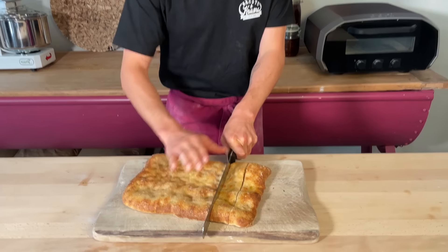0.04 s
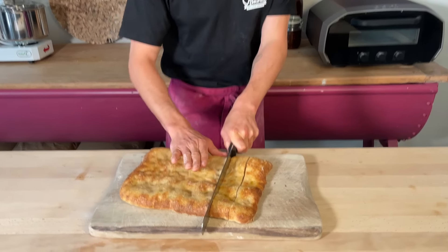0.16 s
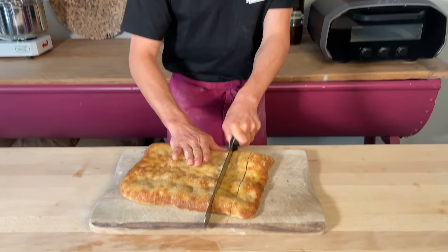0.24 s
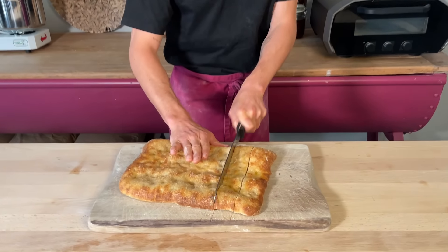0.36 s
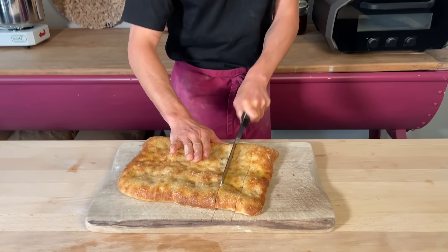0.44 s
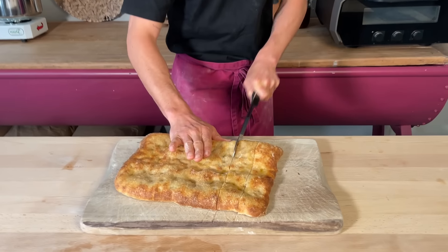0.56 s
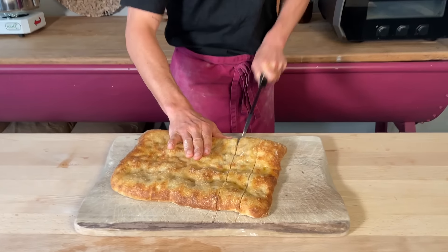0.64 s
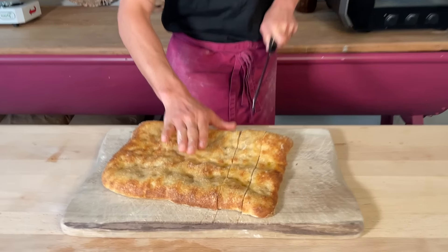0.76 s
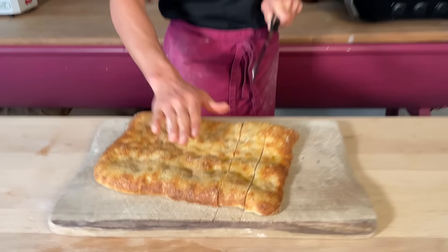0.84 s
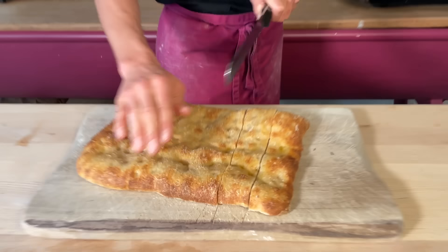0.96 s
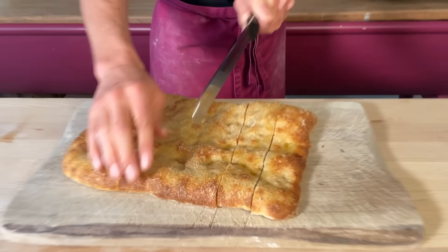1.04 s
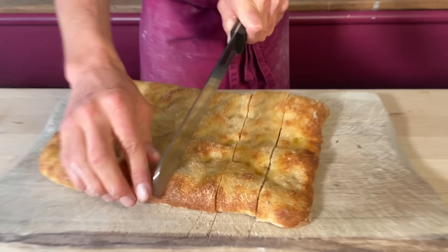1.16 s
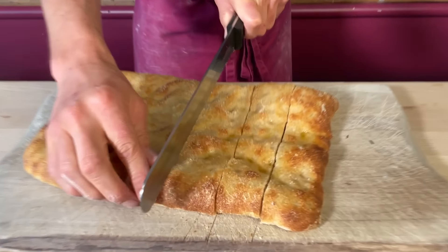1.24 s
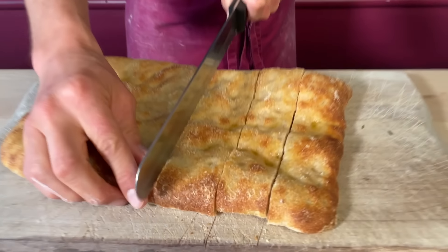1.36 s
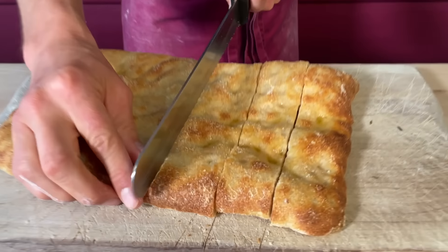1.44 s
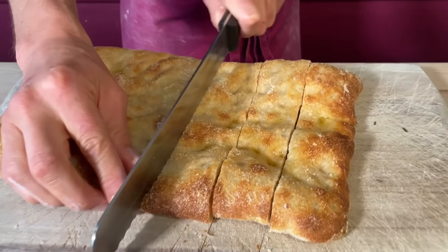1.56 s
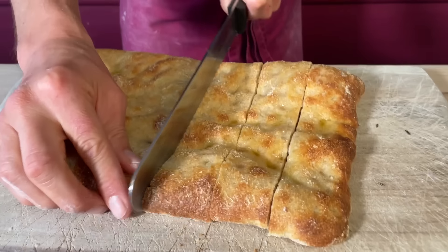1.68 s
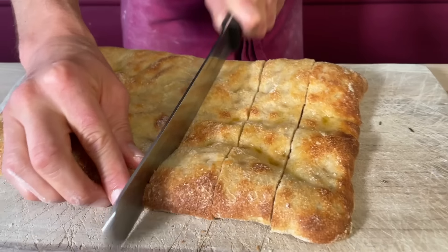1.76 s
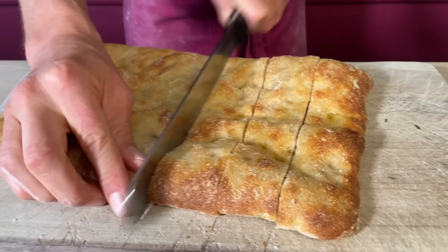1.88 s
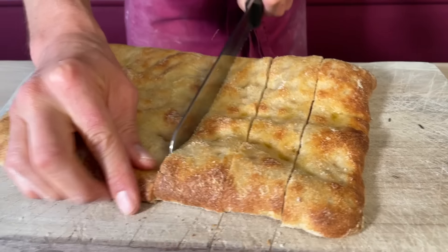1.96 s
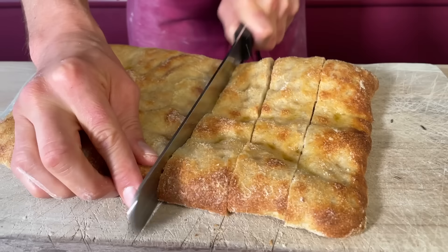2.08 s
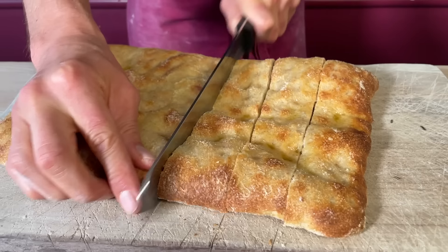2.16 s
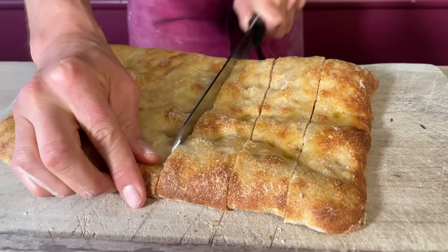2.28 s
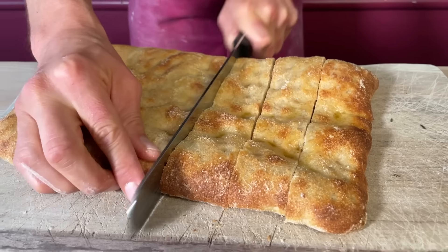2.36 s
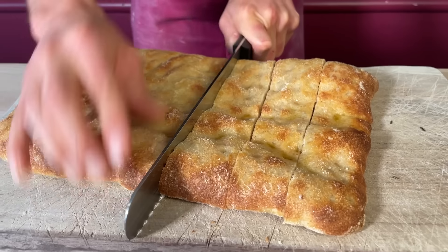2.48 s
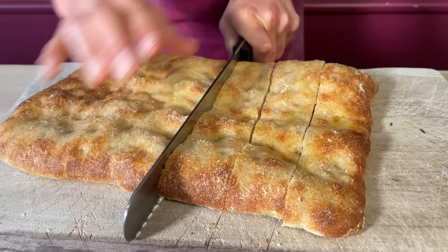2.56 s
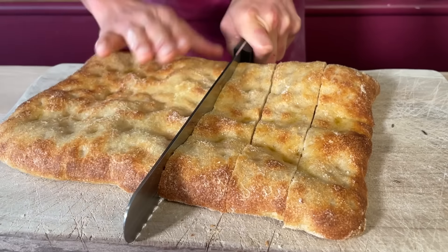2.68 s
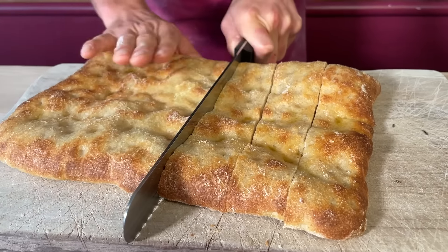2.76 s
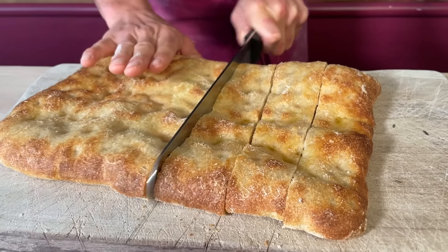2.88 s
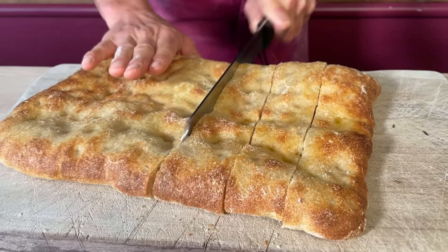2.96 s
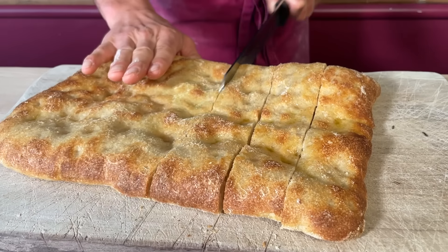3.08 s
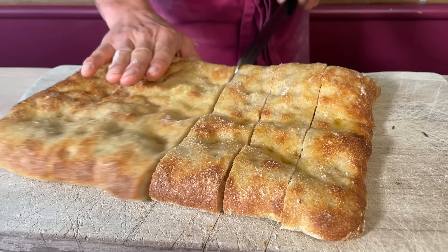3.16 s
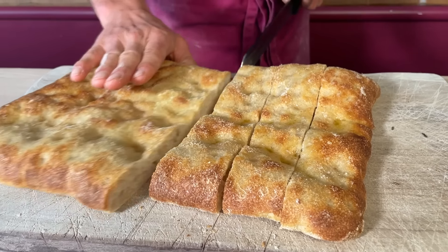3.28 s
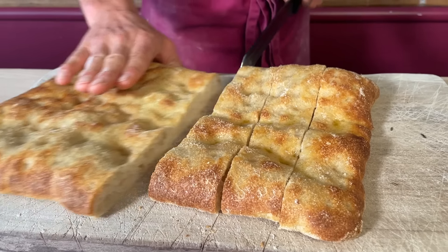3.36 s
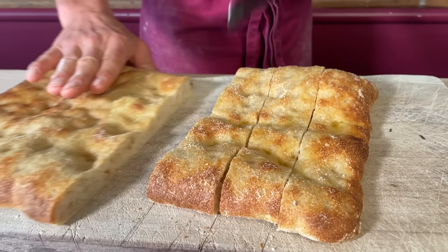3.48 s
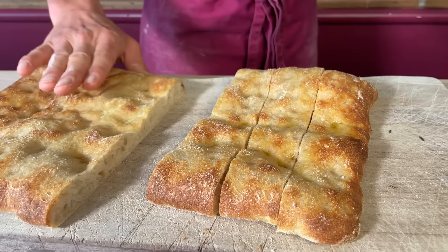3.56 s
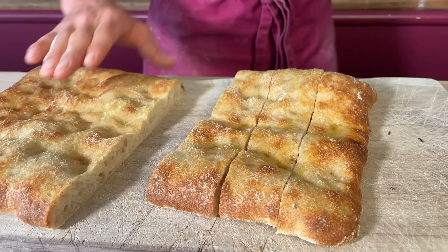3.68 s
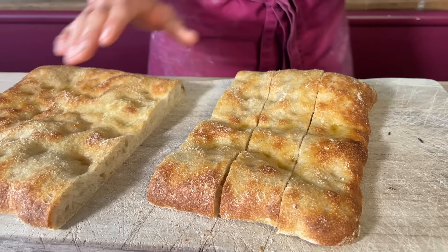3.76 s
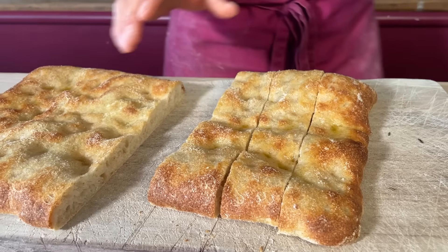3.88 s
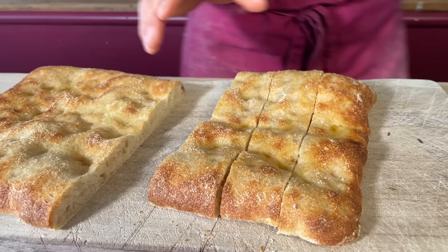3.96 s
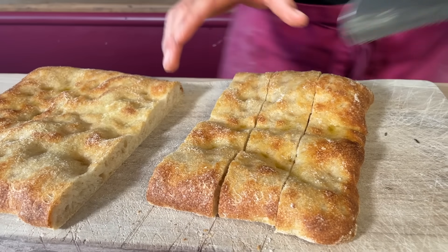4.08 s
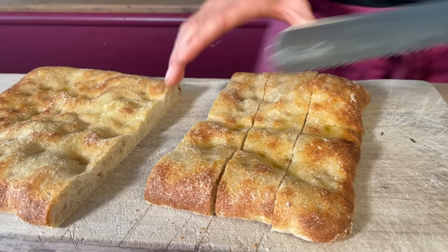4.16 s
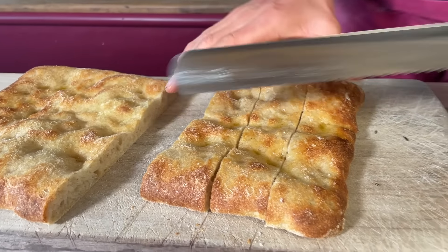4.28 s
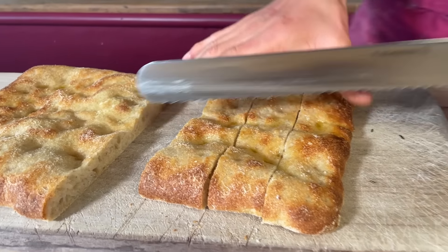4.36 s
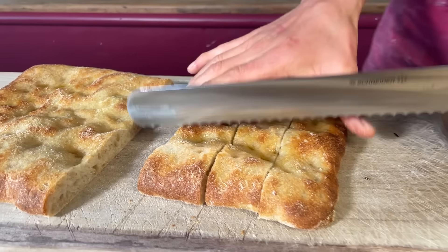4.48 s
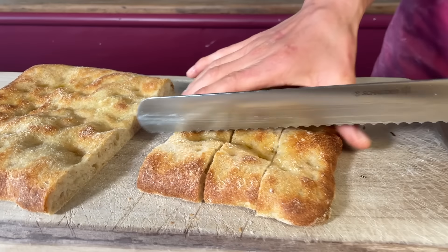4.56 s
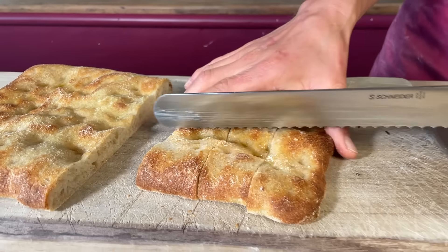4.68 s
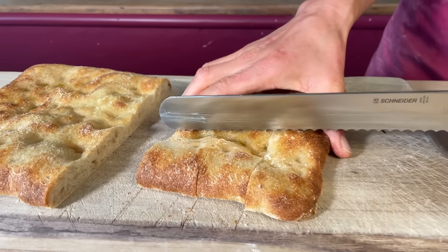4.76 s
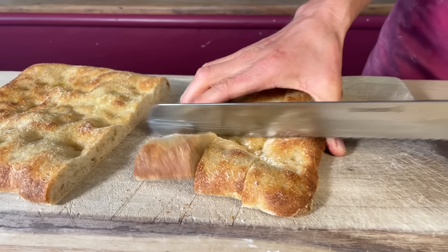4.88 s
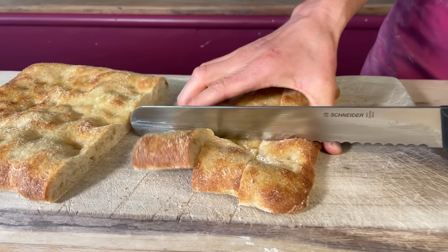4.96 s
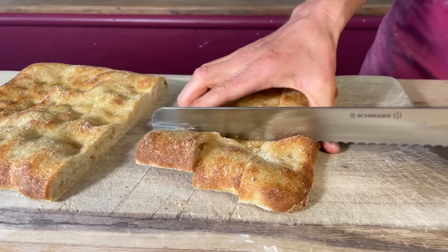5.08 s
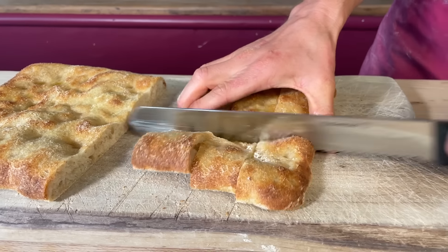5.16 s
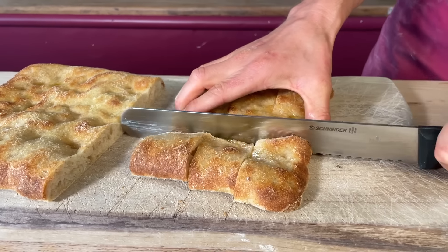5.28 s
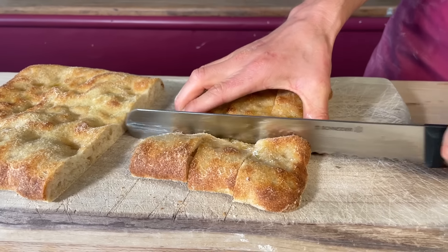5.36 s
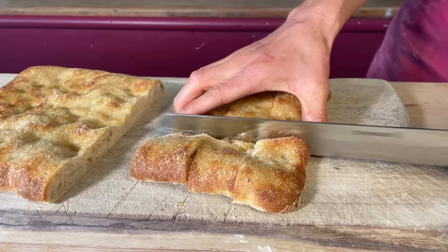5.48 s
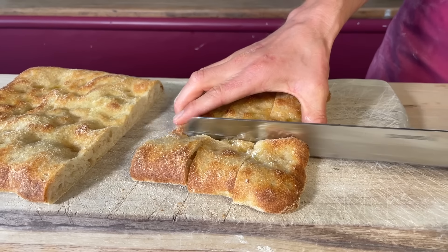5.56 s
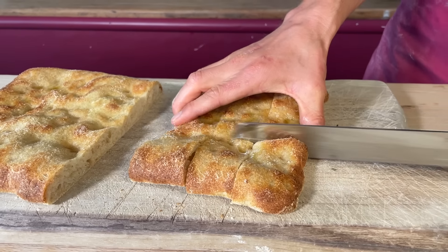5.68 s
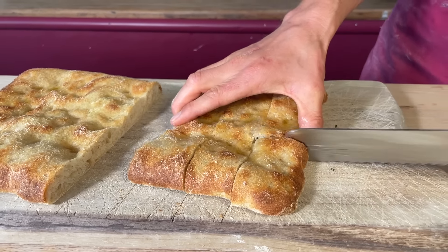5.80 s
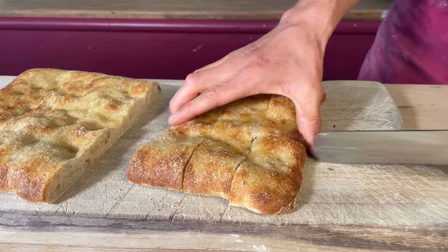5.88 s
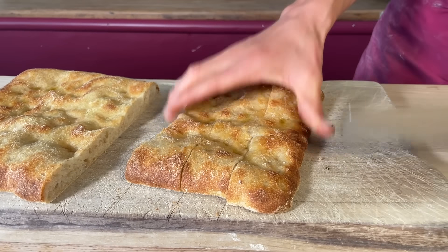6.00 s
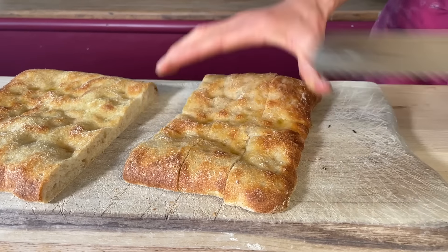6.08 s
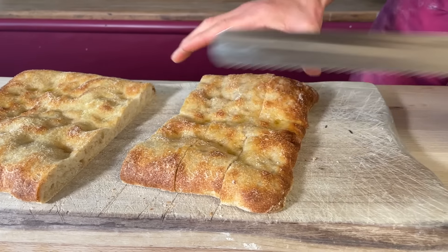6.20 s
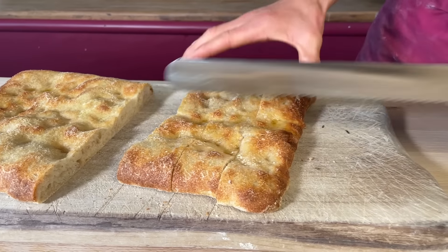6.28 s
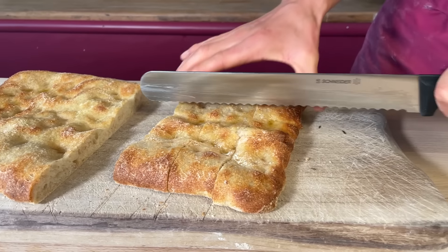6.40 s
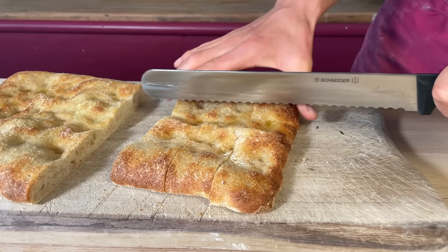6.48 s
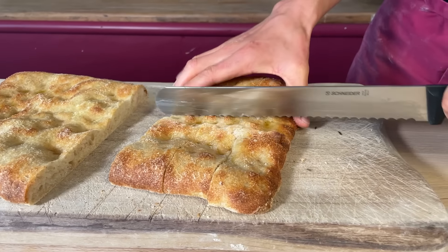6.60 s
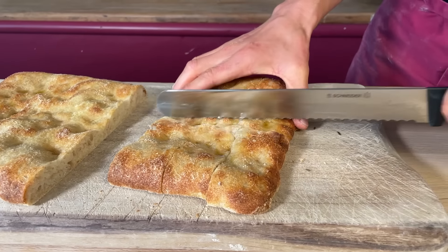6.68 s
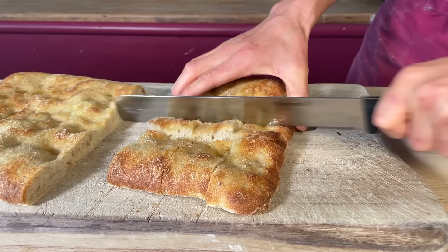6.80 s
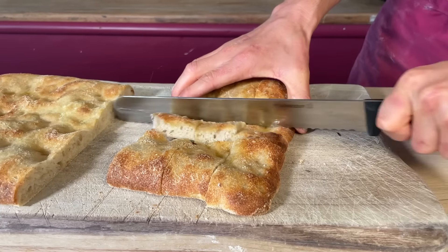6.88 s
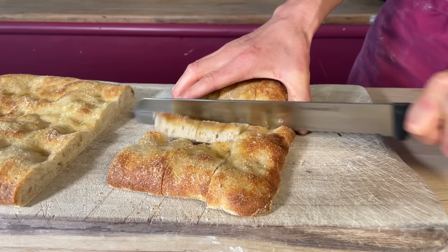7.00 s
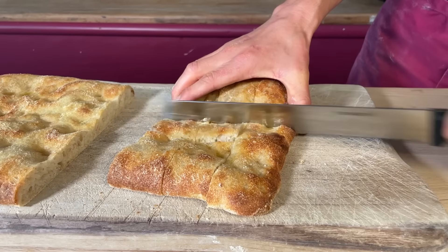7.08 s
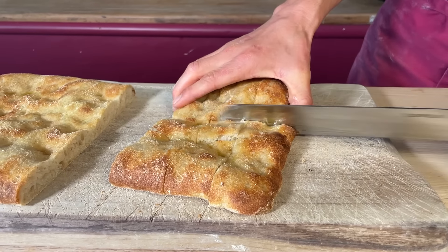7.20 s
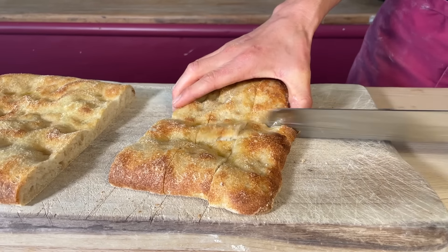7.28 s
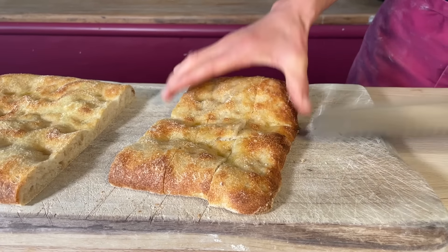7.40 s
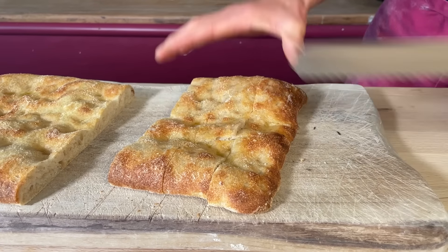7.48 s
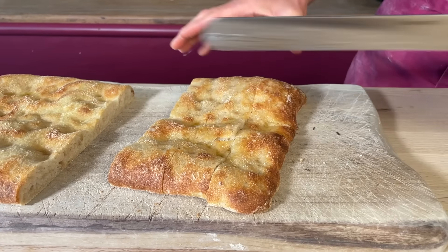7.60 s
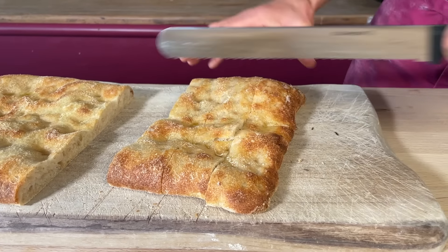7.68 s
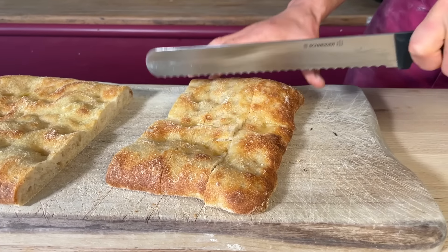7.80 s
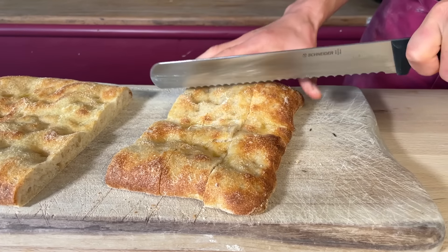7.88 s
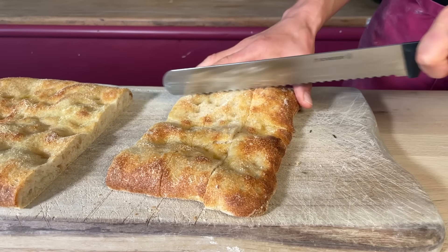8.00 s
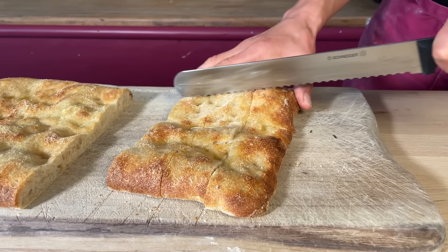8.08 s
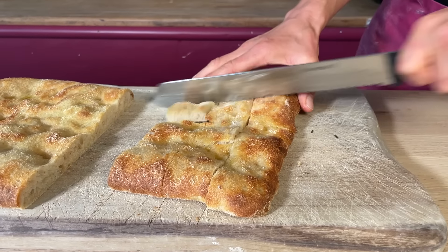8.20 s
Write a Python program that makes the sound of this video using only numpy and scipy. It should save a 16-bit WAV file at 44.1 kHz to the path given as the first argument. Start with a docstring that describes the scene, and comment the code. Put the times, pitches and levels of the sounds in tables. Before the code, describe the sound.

Crisp flat bread is cut on a wooden board, recorded close with short room echoes. A drawn blade rubs and drones, a bright steel tap leads into rapid crunching saw strokes, then a long draw and a quiet pause with bread shifting and clothing rustling. Shorter cuts follow, full of flake snaps and brief steel ringing, over steady low hum.

```python
"""A serrated bread knife saws a crisp flat loaf on a wooden board, close by, over an appliance hum. A hand
settles on the loaf and bread shifts on the board, then saw strokes break streams of crust flakes that crunch,
tick and thud. A long draw rubs and drones; later, soft knocks of the cut piece and a swish of clothes. Steel
taps ring and strokes resume with a short cross cut; a second cross cut and last strokes follow. Fractures are
random clicks sent through coloured impulse responses; steel is a sum of decaying sines."""
import sys
import numpy as np
from scipy import signal
from scipy.fft import irfft
from scipy.io import wavfile
from scipy.ndimage import uniform_filter1d

SR = 44100
rng = np.random.default_rng(int(sys.argv[2]) if len(sys.argv) > 2 else 0)


def transcribe(signal):
    """Save signal, clipped to [-1, 1], as a 16-bit WAV file at the path in sys.argv[1]."""
    frames = np.atleast_2d(signal).T
    limited = np.clip(frames, -1, 1)
    pcm = np.round(limited * 32767).astype(np.int16)
    wavfile.write(sys.argv[1], SR, pcm)


N = 363384
TIME_S = np.arange(N) / SR
BINS_HZ = np.fft.rfftfreq(4096, 1 / SR)


def amp(db):
    """Decibels to gain."""
    return 10 ** (np.asarray(db) / 20)


def evened(x):
    """Scales to rms 1."""
    return x / np.sqrt(np.mean(x ** 2) + 1e-20)


def read(points, hz=BINS_HZ):
    """Joins (Hz, value) points by straight lines on a log-frequency axis."""
    point_hz, value = np.transpose(points)
    return np.interp(np.log(hz + 1), np.log(point_hz + 1), value)


def add(mix, start_s, sound):
    """Mixes a sound in at start_s, cut at the end of the mix."""
    part = mix[max(round(start_s * SR), 0):][:len(sound)]
    part += sound[:len(part)]


def wander(x, step):
    """Random curve over x, rms 1: straight lines between random values one step apart."""
    knots = np.arange(x[0], x[-1] + step, step)
    return evened(np.interp(x, knots, rng.standard_normal(len(knots))))


def impulse(colour_db):
    """Minimum-phase click with this spectrum, floored 90 dB below its top, of energy 1."""
    log_gain = np.log(amp(np.maximum(colour_db, colour_db.max() - 90)))
    circle = np.concatenate([log_gain, log_gain[-2:0:-1]])
    spectrum = np.exp(np.conj(signal.hilbert(circle)))[:len(BINS_HZ)]
    click = irfft(spectrum)
    return click / np.linalg.norm(click)


def ring(x, response):
    """Sends x through an impulse response."""
    return signal.oaconvolve(x, response)[:N]


def fractures(per_s, spread_db, clump_db):
    """Clicks of uneven size, bunched where a tooth catches; their power is evened over longer times."""
    signs = rng.choice([-1, 1], N)
    sizes = amp(spread_db * np.minimum(rng.exponential(1, N), 3.3)) * signs
    catch = amp(clump_db * np.minimum(wander(TIME_S, .003), 1.8))
    clicks = sizes * (rng.random(N) < per_s / SR) * catch
    power = uniform_filter1d(uniform_filter1d(clicks ** 2, size=900), size=600)
    return clicks / np.sqrt(abs(power) + 1e-6)


def scatter(clicks, colour_db, vary_db, step_hz, count=16):
    """Every click comes from one of several spots, each with resonances of its own around the colour."""
    spot = rng.integers(0, count, N)
    ripples_db = np.array([vary_db * wander(BINS_HZ, step_hz) for _ in range(count)])
    ripples_db -= 10 * np.log10(np.mean(amp(ripples_db) ** 2, axis=0))  # mean power stays the colour's
    return sum(ring(clicks * (spot == k), impulse(colour_db + ripples_db[k])) for k in range(count))


def burst(colour_db, spray_db, decay_s, vary_db, step_hz):
    """A crack: one click with a quickly dying noise spray, of peak 1."""
    t = TIME_S[:len(BINS_HZ)]
    spray = amp(spray_db) * rng.standard_normal(len(t)) * np.exp(-t / decay_s)
    spray[0] = 1
    crack = signal.fftconvolve(spray, impulse(colour_db + vary_db * wander(BINS_HZ, step_hz)))
    return crack / abs(crack).max()


def resonate(x, hz, width_hz):
    """A steep resonance that follows the curve hz; rms 1."""
    turn = np.exp(2j * np.pi * np.cumsum(hz) / SR)
    r = np.exp(-np.pi * width_hz / SR)
    baseband = signal.lfilter([1], [1, -2 * r, r * r], x / turn)
    return evened((turn * baseband).real)


def swell(peak_s, rise_s, fall_s):
    """A gain that grows to 1 at peak_s and dies away."""
    return np.exp(-np.maximum((peak_s - TIME_S) / rise_s, (TIME_S - peak_s) / fall_s))


# mains hum partials: (frequency [Hz], rms before the slow rise [dB])
HUM = [(100, -56), (200, -78.5), (300, -70.5)]
# slow rise of the hum: (time [s], gain [dB])
HUM_RISE = [(0, -1.5), (1.2, -1.5), (4.2, -1), (5.1, 1), (8.2, 2)]
# colour of the room's rush: (frequency [Hz], relative level per Hz [dB])
AIR = [(15, -30), (25, -13), (43, -17), (68, -17), (102, -9), (153, -10.5), (285, -12), (335, -14),
       (695, -15), (796, -13.5), (887, -15.5), (1260, -18.5), (4140, -35), (14400, -41), (16000, -47)]
AIR_DB, AIR_DRIFT_DB, AIR_DRIFT_STEP_S = -57.6, .5, .25


def background():
    """An appliance hums in slowly rising sine partials over the soft, drifting filtered noise of the room."""
    hum = sum(amp(db) * np.sqrt(2) * np.sin(2 * np.pi * (hz * TIME_S + rng.random())) for hz, db in HUM)
    hum_gain = amp(np.interp(TIME_S, *np.transpose(HUM_RISE)))
    air = ring(rng.standard_normal(N), impulse(read(AIR)))
    drift_db = AIR_DRIFT_DB * wander(TIME_S, AIR_DRIFT_STEP_S)
    return hum * hum_gain + amp(AIR_DB + drift_db) * air


# reverberation: (frequency [Hz], t60 [s])
KITCHEN = [(150, 2.34), (400, 1.15), (530, 1.03), (700, 1.22), (1500, 0.75), (4000, 1.48), (9000, 0.16),
           (16000, 0.1)]


def kitchen(x, early_db, tail_db, treble_db):
    """Quick echoes from board and worktop, then a tail of sparse taps, duller and decaying by band."""
    t = TIME_S[:SR]
    onset = np.clip(t / .012 - .5, 0, 1)
    taps = rng.standard_normal(SR) * (rng.random(SR) < .1) * onset
    hz, frames_s, z = signal.stft(taps, SR, nperseg=256)
    shade_db = read([(2000, 0), (6000, treble_db)], hz)[:, None]
    dying = z * amp(-60 * frames_s / read(KITCHEN, hz)[:, None])
    full = signal.istft(dying, SR, nperseg=256)[1]
    tail = signal.istft(dying * amp(shade_db), SR, nperseg=256)[1]
    early = rng.standard_normal(SR) * (t > .002) * np.exp(-t / .012)
    early_sound = amp(early_db) * ring(x, early / np.linalg.norm(early))
    return x + early_sound + amp(tail_db) * ring(x, tail / np.linalg.norm(full))


RUB_ATTACK_S, RUB_FADE_DB_PER_S, HISS_FADE_DB_PER_S = 0.018, 67.5, 88
HISS_SWELL_SHARE = 0.71  # share of a rub's swell that its hiss follows


def rub_gains(rubs):
    """Gains of a rub's body and hiss: an attack, a hold that swells or sags, a release."""
    body, hiss = np.zeros((2, N))
    for start_s, length_s, force_db, swell_db, brittle_db in rubs:
        t = np.arange(0, length_s + 1, 1 / SR)
        attack = 1 - np.exp(-t / RUB_ATTACK_S)
        after_s = np.maximum(t - length_s, 0)
        lean_db = swell_db * (np.minimum(t / length_s, 1) - .5)
        body_db = force_db + lean_db - RUB_FADE_DB_PER_S * after_s
        hiss_db = force_db + brittle_db + HISS_SWELL_SHARE * lean_db - HISS_FADE_DB_PER_S * after_s
        add(body, start_s, attack * amp(body_db))
        add(hiss, start_s, attack * amp(hiss_db))
    return body, hiss


# cloth: (start [s], length [s], force [dB], swell [dB], hiss over force [dB])
SWISHES = [(4.21, 0.12, -63.5, 2, 1), (4.305, 0.028, -58, -4.5, 0), (4.338, 0.17, -50.5, 1.5, 0)]
# colours of cloth: (frequency [Hz], relative level per Hz [dB])
SWISH_BODY = [(300, -17), (700, -6), (1200, -0.5), (1900, -2), (2900, -1.5), (4000, -5.5), (8000, -14),
              (16000, -38)]
SWISH_HISS = [(1000, -25), (2000, -7), (2900, 4.5), (4000, 0.5), (6500, -1), (9500, -3.5), (12500, -5),
              (16000, -13)]


def swishing():
    """Cloth slides on cloth as the cook steps aside: tiny slips merge into noise that dulls as it fades."""
    body, hiss = rub_gains(SWISHES)
    body_noise = ring(rng.standard_normal(N), impulse(read(SWISH_BODY)))
    hiss_noise = ring(rng.standard_normal(N), impulse(read(SWISH_HISS)))
    return body * body_noise + hiss * hiss_noise


# cut piece flops back, fingers and blade settle on the loaf:
# (time [s], envelope peak [dB], mean pitch [Hz], rise [s])
BUMPS = [(3.629, -53.5, 172, 0.018), (3.675, -51, 126, .025), (4.576, -42, 810, .002),
         (4.577, -38, 1190, 0.0017), (4.623, -39.5, 600, 0.0027), (4.655, -41, 820, 0.0028),
         (4.76, -43, 1050, 0.0014)]
BUMP_SMEAR = .2  # rms share by which pitch strays from cycle to cycle


def bumping():
    """Soft bread takes a knock with a rounded push of unsteady pitch and no click."""
    out, t = np.zeros(N), TIME_S[:SR // 3]
    for start_s, db, hz, rise_s in BUMPS:
        turns = np.cumsum(hz * (1 + BUMP_SMEAR * wander(t, 1 / hz))) / SR
        push = t / rise_s * np.exp(1 - t / rise_s)
        add(out, start_s, amp(db) * push * np.sin(2 * np.pi * turns))
    return out


JUDDER_DB, JUDDER_STEP_S = 1.8, .016  # stick and slip


def rubbing(rubs, body_db, hiss_db, per_s, spread_db, clump_db, crumbs_db, level_db, treble_db):
    """Many small slips give a hollow rub; the hiss on top flares as crumbs catch on the edge."""
    force, brittle = rub_gains(rubs)
    slips = fractures(per_s, spread_db, clump_db)
    crumbs = evened(amp(crumbs_db * wander(TIME_S, 0.0023)))
    hiss = scatter(slips * crumbs, hiss_db, vary_db=8.5, step_hz=938, count=8)
    body = ring(slips, impulse(body_db))
    judder = evened(amp(JUDDER_DB * wander(TIME_S, JUDDER_STEP_S)))
    return judder * (amp(level_db) * force * body + amp(treble_db) * brittle * hiss)


# hand on loaf and bread on board: a hand lands and settles on the bread, the bread is pushed over the board:
# (start [s], length [s], relative force [dB], swell [dB], relative hiss over force [dB])
SLIDES = [ (0.0, 0.015, -33, -24.5, -20.5), (0.13, 0.15, -55.5, 16, -4.5), (0.74, 0.21, -57, 6, -5),
          (2.36, 0.14, -42.5, -15, -15.5), (2.69, 0.16, -61.5, 5, 0.5), (3.15, 0.31, -43, 0, -7.5),
          (4.615, 0.05, -45.5, -2, -16), (4.74, 0.085, -68, 24, -6), (6.44, 0.07, -62, -4, -28)]
# colours of hand and bread handling on the board: (frequency [Hz], relative level per Hz [dB])
SLIDE_RUB = [(76, -33), (130, -9.5), (205, -16), (270, -5.5), (346, -5.5), (455, -5), (824, -7.5),
             (1330, -8), (3500, -21.5), (4550, -29), (7700, -120)]
SLIDE_HISS = [(1650, -10), (2800, 1), (3540, -26), (5240, -7.5), (11600, -21.5), (15000, -25), (16000, -51)]


def sliding():
    """A hand lands and settles on the loaf and bread shifts over the board: dense slips through a dull rub and
    a hiss."""
    return rubbing(SLIDES, read(SLIDE_RUB), read(SLIDE_HISS), per_s=10000, spread_db=2.6,
                   clump_db=1.8, crumbs_db=1.5, level_db=-2.5, treble_db=-1)


# blade wedged in loaf on board: (frequency [Hz], width [Hz], lift before scaling [dB])
WEDGED = [(505, 100, 9), (1050, 140, 7), (1240, 130, 6), (1630, 130, 4), (2260, 140, 3)]


def wedged_db():
    """Unscaled lift in dB that the wedged blade's resonances give to each frequency."""
    return sum(db / (1 + (2 * (BINS_HZ - hz) / width_hz) ** 2) for hz, width_hz, db in WEDGED)


# long-cut draws: (start [s], length [s], relative force [dB], swell [dB], relative hiss over force [dB])
LONG_DRAWS = [(0.215, 0.37, -43.5, 12, -9.5), (2.829, 0.27, -40.5, 2.5, -14.5)]
# colours of the long rub and of steel: (frequency [Hz], relative level per Hz [dB])
LONG_RUB = [(94, -37.5), (160, -11.5), (275, -8), (330, -11), (492, -5), (538, -12.5), (715, -9),
            (846, -18), (1040, -6.5), (1250, -6.5), (1550, -12.5), (3500, -23), (4550, -33), (7700, -120)]
STEEL_HISS = [(70, -2.5), (300, -1), (1650, 2), (2800, -9.5), (3080, -20), (3800, -7.5), (4600, -15.5),
              (5130, -10.5), (6770, -15), (10600, -18), (16000, -29)]


def long_drawing():
    """The blade is drawn along a long cut: slips through a hollow body and a steel hiss."""
    return rubbing(LONG_DRAWS, read(LONG_RUB) + 0.097 * wedged_db(), read(STEEL_HISS), per_s=6000,
                   spread_db=1.5, clump_db=1.5, crumbs_db=2.5, level_db=-0.5, treble_db=5.5)


# cross-cut draws: (start [s], length [s], relative force [dB], swell [dB], relative hiss over force [dB])
CROSS_DRAWS = [(5.3, 0.48, -47.5, 5.5, -19), (6.8, 0.5, -45.5, -5, -15.5)]
# colour of the cross rub: (frequency [Hz], relative level per Hz [dB])
CROSS_RUB = [(120, -37), (200, -13), (420, -8), (490, -1.5), (545, -7.5), (738, -9.5), (1040, -6.5),
             (1300, -5), (1610, -6.5), (1950, -13), (2330, -10.5), (3500, -23.5), (4550, -52), (7700, -120)]


def cross_drawing():
    """The blade slides through a short cross cut; its hiss is halfway between flakes and steel."""
    hiss_db = (read(FLAKES) + read(STEEL_HISS)) / 2
    return rubbing(CROSS_DRAWS, read(CROSS_RUB) + 0.21 * wedged_db(), hiss_db, per_s=4000,
                   spread_db=3.0, clump_db=0.0, crumbs_db=0.0, level_db=-2.5, treble_db=8.5)


# wedged blade drones as its tip leaves a cut:
# (loudest time [s], rise [s], fall [s], lowest-mode level [dB], gain of upper modes [dB])
DRONES = [(0.63, .11, .16, -42, -54), (3.02, .13, .2, -46.5, -56), (5.72, .09, .1, -46, -47),
          (7.255, .17, .09, -47, -46.5)]
# drone resonances: (mean frequency [Hz], width [Hz], relative level [dB])
DRONE_MODES = [(500, 70, 0), (1050, 100, 0), (1640, 150, -4), (2310, 200, -9)]
DRONE_WAVER, DRONE_WAVER_STEP_S = .022, .06  # rms share of pitch


def drone():
    """The drawn blade's resonances, damped by the loaf, waver in pitch, swell and linger."""
    slips = rng.standard_normal(N)
    waver = 1 + DRONE_WAVER * wander(TIME_S, DRONE_WAVER_STEP_S)
    lowest, *others = (amp(db) * resonate(slips, hz * waver, width_hz) for hz, width_hz, db in DRONE_MODES)
    upper = sum(others)
    return sum(swell(peak_s, rise_s, fall_s) * (amp(low_db) * lowest + amp(upper_db) * upper)
               for peak_s, rise_s, fall_s, low_db, upper_db in DRONES)


# nasal rasp of teeth along the crust:
# (loudest time [s], rise [s], fall [s], level [dB], centre when loudest [Hz], width [Hz])
SCRAPES = [(0.35, 0.038, .03, -44.5, 2580, 2600), (0.43, 0.11, 0.14, -42.5, 1300, 380),
           (0.585, 0.026, 0.031, -39, 1240, 450), (0.6, .05, 0.049, -50, 2490, 2000),
           (1.645, 0.027, .025, -38, 2480, 1300), (1.905, .025, .025, -36.5, 2400, 1300),
           (2.885, 0.019, 0.1, -47.5, 2150, 900), (2.91, 0.029, .115, -34.5, 1185, 450),
           (2.98, .08, .2, -65, 5150, 247), (6.775, 0.034, 0.022, -42, 3300, 1800),
           (7.13, 0.11, 0.063, -45.5, 1170, 350)]
SCRAPE_SAG_HZ_PER_S = 200


def scraping():
    """Teeth dragged along the crust drive resonances that sink as the blade is drawn back."""
    slips = fractures(per_s=3000, spread_db=6.0, clump_db=8.0)
    out = np.zeros(N)
    for peak_s, rise_s, fall_s, db, hz, width_hz in SCRAPES:
        sinking_hz = hz - SCRAPE_SAG_HZ_PER_S * np.clip(TIME_S - peak_s, -.5, .5)
        out += amp(db) * swell(peak_s, rise_s, fall_s) * resonate(slips, sinking_hz, width_hz)
    return out


# one bending mode glides as the contact moves:
# (start [s], length [s], rms level [dB], mean start pitch [Hz], mean end pitch [Hz])
WHINES = [(1.281, 0.013, -40.5, 1500, 1490), (1.282, 0.039, -56, 1930, 1750), (1.317, .09, -57, 1710, 1840),
          (4.555, .075, -56, 2170, 2310), (7.981, 0.123, -51.5, 1835, 1733), (8.168, .09, -44, 1815, 1727)]
WHINE_TREMBLE, WHINE_FLUTTER_DB, TOOTH_S = .03, 3.5, .003  # rms share of pitch, rms dB, s between teeth


def whining():
    """Grazing teeth keep one mode of the blade going as a thin, unsteady tone."""
    out = np.zeros(N)
    for start_s, length_s, db, start_hz, end_hz in WHINES:
        t = np.arange(0, length_s, 1 / SR)
        hz = np.linspace(start_hz, end_hz, len(t)) * (1 + WHINE_TREMBLE * wander(t, TOOTH_S))
        level = signal.windows.tukey(len(t), .5) * amp(WHINE_FLUTTER_DB * wander(t, TOOTH_S))
        add(out, start_s, amp(db) * evened(level * np.sin(2 * np.pi * np.cumsum(hz) / SR)))
    return out


# blade modes: (nominal frequency [Hz], nominal level [dB], t60 at ring time 1 [s])
BLADE = [(1485, 5, .025), (1700, -4, .035), (1810, -3, .05), (2280, -9, .03), (4872, -16, .025),
         (7000, -3, .01), (7470, -12, .04), (8100, -10, .07), (9180, -7, .045), (9850, -8, .035),
         (10620, -7, .04), (11500, -7, .04), (14300, -5, .012)]
CONTACT_VARY_DB, CONTACT_DETUNE = 6, .02  # +- dB; +- share of pitch, less for longer rings


def steel(high_db, ring_time):
    """Ring at one contact: low bending modes with the loaf's click, high ones with the crust's."""
    t = TIME_S[:SR // 2]
    louder, sharper = rng.uniform(-1.0, 1, (2, len(BLADE), 1))
    hz, db, t60_s = np.transpose(BLADE)[:, :, None]
    tuned_hz = hz * (1 + sharper * CONTACT_DETUNE / (1 + ring_time ** 2))
    decay_db = 60 * t / (t60_s * ring_time)
    modes = amp(db + CONTACT_VARY_DB * louder - decay_db) * np.sin(2 * np.pi * tuned_hz * t)
    is_low = hz[:, 0] < 3000
    low, high = (m / np.linalg.norm(m) for m in (modes[is_low].sum(0), modes[~is_low].sum(0)))
    add(low, 0, amp(-1) / ring_time * impulse(read(CRUNCH)))
    add(high, 0, amp(2) / ring_time ** .5 * impulse(read(FLAKES)))
    return low + amp(high_db) * high


# steel knocks on crust: (time [s], peak [dB], high modes over low [dB], ring time [multiple of t60])
TAPS = [(1.2845, -24.5, -9, 1), (4.598, -42, 9, 1.5), (4.818, -41, 3, 1), (6.5865, -32.5, -9, .4),
        (7.2705, -27, -3, .6), (7.283, -34, 5, 4), (7.9493, -33, -1, .7), (8.02, -35, -4, .5)]
# teeth graze crust:
# (start [s], end [s], relative level [dB], high modes over low [dB], ring time [multiple of t60])
GRAZES = [(0.588, 0.717, -53.5, -3.5, 2.5), (1.284, 1.424, -62.5, -1.5, .9), (4.56, 4.69, -65, 3, 1),
          (5.703, 5.749, -56.5, 2.5, 1.5), (5.837, 5.977, -61.5, -7.5, 3), (6.563, 6.705, -61.5, -9.5, .4),
          (7.24, 7.34, -70, -12, 3), (7.93, 8.224, -59.5, -8, .4)]
CATCH_DB, CATCH_S = 3.5, .011  # rms depth before a cap, s between catches


def blade(count=4):
    """Taps and grazing teeth ring the steel; the point of contact shifts from catch to catch."""
    out = np.zeros(N)
    for start_s, db, high_db, ring_time in TAPS:
        chatter = rng.standard_normal(len(BINS_HZ)) * np.exp(-TIME_S[:len(BINS_HZ)] / .0028)
        knock = signal.fftconvolve(chatter, steel(high_db, ring_time))
        add(out, start_s, amp(db) * knock / abs(knock).max())
    catches = evened(amp(CATCH_DB * np.minimum(wander(TIME_S, CATCH_S), 1.5)))
    teeth = amp(1.5) * catches * fractures(per_s=1700, spread_db=2.5, clump_db=0.5)
    spot = rng.integers(0, count, N)[(TIME_S / CATCH_S).astype(int)]
    for start_s, end_s, db, high_db, ring_time in GRAZES:
        span = slice(int(start_s * SR), int(end_s * SR))
        touch = amp(db) * teeth[span] * signal.windows.tukey(len(teeth[span]), .5)
        for k in range(count):
            add(out, start_s, signal.fftconvolve(touch * (spot[span] == k), steel(high_db, ring_time)))
    return out


STRAYS_PER_S, STRAY_DB, STRAY_SPREAD_DB = 35, 14, 4  # dB over the weighted treble gain, +- dB


def stray_flakes(count=6):
    """Small flakes tick at random wherever the blade moves through the crust."""
    draws = rub_gains(CROSS_DRAWS)[1] + amp(-12) * rub_gains(LONG_DRAWS)[1]
    moving = amp(2.5) * stroke_gains()[1] + draws
    sizes = amp(STRAY_DB + STRAY_SPREAD_DB * rng.uniform(-1, 1, N))
    breaks = moving * sizes * (rng.random(N) < STRAYS_PER_S / SR)
    flake = rng.integers(0, count, N)
    out = np.zeros(N)
    for k in range(count):
        tick = burst(read(FLAKES), spray_db=-7, decay_s=.0015, vary_db=5, step_hz=1200)
        out += ring(breaks * (flake == k), tick)
    return out


# largest flakes: (time [s], treble peak [dB], loaf knock over treble [dB])
SNAPS = [(0.168, -37.5, -3), (0.331, -31, 3), (0.372, -40, 11.5), (0.4452, -37, -1), (0.4713, -34, 5),
         (1.353, -35.5, -3), (1.5263, -20.5, -6), (1.447, -42, 3), (1.556, -30, -8), (1.597, -35, 9),
         (1.735, -29, 4), (1.785, -32, 10), (1.843, -26, -12), (1.895, -33.5, 12), (2.112, -26, -6),
         (2.23, -26.5, -5), (2.381, -29, -13), (2.845, -48, 14), (4.751, -43, -8), (4.838, -51, -4),
         (4.8597, -23.5, -5), (4.888, -42, 11), (4.9465, -31, 12.5), (5.105, -25.5, -3), (5.2045, -29, -1),
         (5.469, -36, 0), (5.5232, -45, 6), (5.546, -31, -6), (5.592, -30.5, -3), (5.6899, -32, -7),
         (6.705, -43, 4), (6.735, -22, -6), (6.751, -23, -12), (6.774, -26, 3), (6.809, -31, 10),
         (6.861, -29, -14), (6.954, -36, 8), (6.993, -29, 2), (7.1215, -32, 2.5), (7.218, -30.5, -4),
         (7.2297, -33.5, 7), (8.043, -41.5, 11), (8.148, -37, 10), (8.188, -40, 16.5), (8.191, -41, 16),
         (8.2115, -45, 0), (8.234, -38.5, 17.5)]


def snapping():
    """Large flakes break one by one and knock on the loaf."""
    out = np.zeros(N)
    for start_s, db, knock_db in SNAPS:
        tick = burst(read(FLAKES), spray_db=-6, decay_s=.0018, vary_db=3, step_hz=1200)
        knock = burst(read(CRUNCH), spray_db=-11, decay_s=.0012, vary_db=2, step_hz=400)
        add(out, start_s, amp(db) * (tick + amp(knock_db) * knock))
    return out


# saw strokes: (start [s], length [s], relative force [dB],
# brittleness = relative treble over force [dB], depth = relative bass over force [dB])
STROKES = [ (0.293, 0.09, -42, -18, -20), (0.529, 0.14, -43, -16, -12), (1.44, 0.15, -38, -10.5, -12),
           (1.588, 0.12, -32, -16, -11), (1.716, 0.12, -28, -16, -9.5), (1.842, 0.12, -28.5, -14, -8.5),
           (1.971, 0.16, -33, -13.5, -0.5), (2.133, 0.13, -37, -17, -3), (2.254, 0.15, -35.5, -15, -11.5),
           (2.863, 0.14, -45, -28, -18), (4.842, 0.055, -41.5, -18, -19), (4.874, 0.091, -35, -12.5, -6.5),
           (5.0, 0.087, -40.5, -10, -25), (5.089, 0.12, -39, -10.5, -6.5), (5.663, 0.1, -49.5, -6, 0),
           (6.699, 0.15, -35, -12, -13.5), (6.944, 0.14, -49, -8, -9), (7.21, 0.16, -49, -14, -8),
           (8.139, 0.14, -34, -13, -12)]
TURN_CRUNCH_DB, TURN_TICKS_DB, TURN_THUD_DB = -18.5, -12, -10.5  # at a stroke's ends
SETTLE_S, SETTLE_DB = 0.045, -10  # crumbs ticking on after a stroke


def stroke_gains():
    """Gains of crunch, ticks and thud: all follow the blade's speed, a half sine in each stroke."""
    crunch, ticks, thud = np.zeros((3, N))
    for start_s, length_s, force_db, brittle_db, depth_db in STROKES:
        slowness = 1 - np.sin(np.pi * np.arange(0, length_s, 1 / SR) / length_s)
        add(crunch, start_s, amp(force_db + TURN_CRUNCH_DB * slowness))
        add(ticks, start_s, amp(force_db + brittle_db + TURN_TICKS_DB * slowness))
        add(thud, start_s, amp(force_db + depth_db + TURN_THUD_DB * slowness))
    settling = np.exp(-TIME_S[:SR // 3] / SETTLE_S)
    ticks = np.maximum(ticks, amp(SETTLE_DB) * ring(ticks, settling / settling.sum()))
    return uniform_filter1d(np.array([crunch, ticks, thud]), size=260, axis=1)


# colours of loaf, crust and board: (frequency [Hz], relative level per Hz [dB])
CRUNCH = [(160, -32.5), (300, -7.5), (522, 1.5), (574, -1.5), (625, 2), (680, -2), (725, 0.5), (1320, -0.5),
          (1520, -4), (1690, -1), (2600, -11), (3500, -21), (4550, -32), (7700, -120)]
FLAKES = [(1650, -6.5), (2600, -9.5), (3300, -8), (4700, -3.5), (5700, -2), (9530, -3.5), (11000, -6),
          (12800, -11), (15000, -10.5), (16000, -23)]
THUD = [(71, -50), (120, -3.5), (178, -3.5), (260, 1.5), (329, -2), (430, -7.5), (560, -42), (950, -120)]


def sawing():
    """The same fractures tick in the crust, crunch in the loaf and thud in the board by depth of cut."""
    force, brittle, depth = stroke_gains()
    clicks = fractures(per_s=3500, spread_db=2.5, clump_db=2.1)
    crunch = scatter(clicks, read(CRUNCH), vary_db=2.5, step_hz=246.6)
    hardness = amp(2.2 * wander(TIME_S, 0.0054))  # hard spots in the crust tick louder
    ticks = scatter(clicks * evened(hardness), read(FLAKES), vary_db=4.0, step_hz=749)
    thud = ring(clicks, impulse(read(THUD)))
    return amp(2.5) * force * crunch + amp(6.5) * brittle * ticks + amp(-3.5) * depth * thud


def scene():
    """All the knife work, bread and cloth in the room, over the hum."""
    handling = swishing() + bumping() + sliding()
    draws = long_drawing() + cross_drawing() + drone() + scraping()
    ringing = whining() + blade()
    cutting = stray_flakes() + snapping() + sawing()
    work = handling + draws + ringing + cutting
    return (kitchen(work, early_db=-12, tail_db=-11, treble_db=-10) + background())[None]


EDGE_HZ = 16000


def record(dry):
    """The microphone sheds the deepest bass; then the band limit."""
    thinned = signal.sosfilt(signal.butter(3, 38, "highpass", fs=SR, output="sos"), dry)
    band_limit = signal.firwin(511, EDGE_HZ, window=("kaiser", 9), fs=SR)
    return signal.oaconvolve(thinned, band_limit[None], "same")


dry = scene()
out = record(dry)
transcribe(out)
```